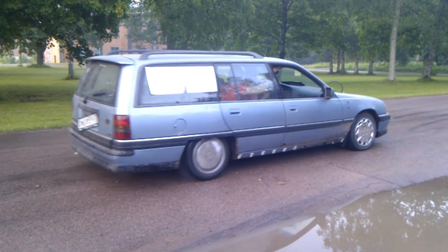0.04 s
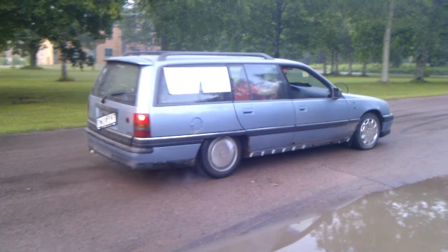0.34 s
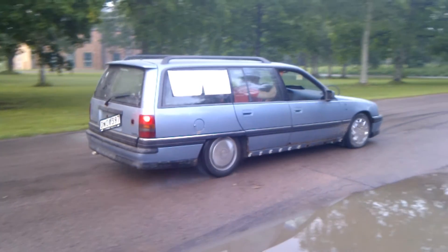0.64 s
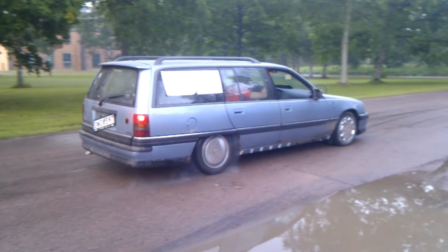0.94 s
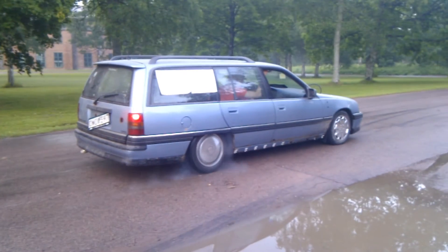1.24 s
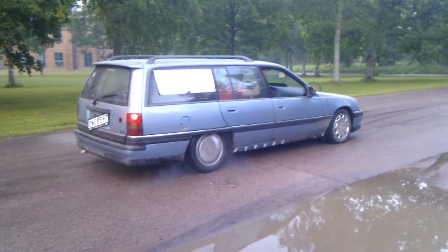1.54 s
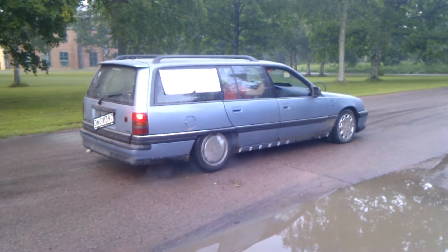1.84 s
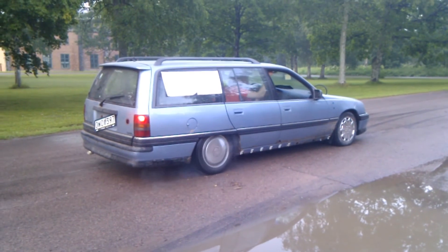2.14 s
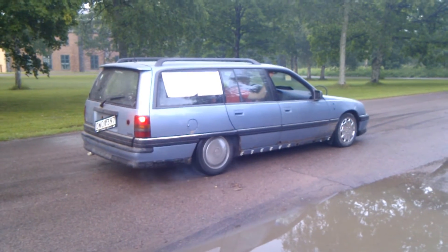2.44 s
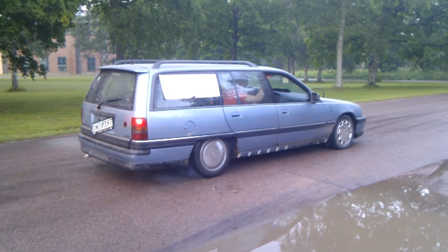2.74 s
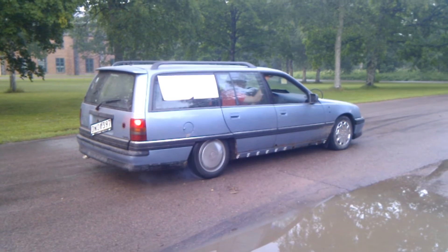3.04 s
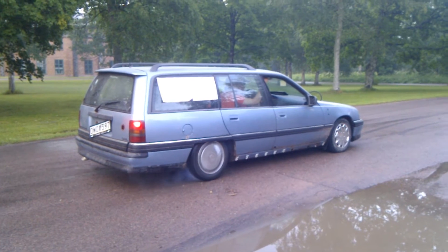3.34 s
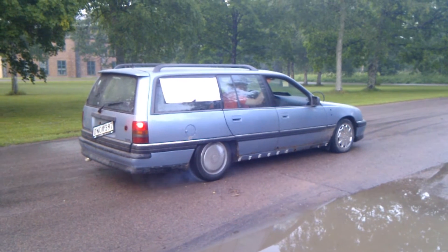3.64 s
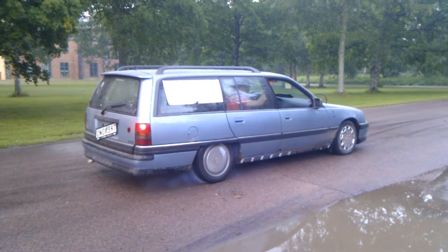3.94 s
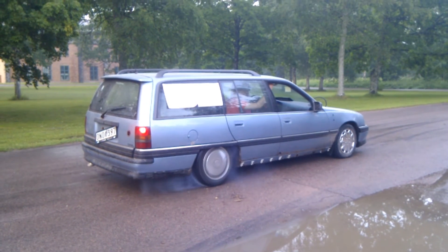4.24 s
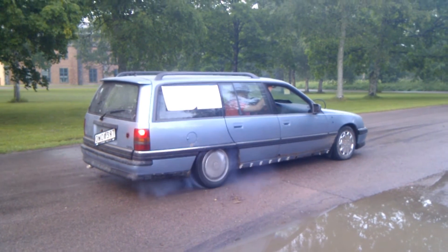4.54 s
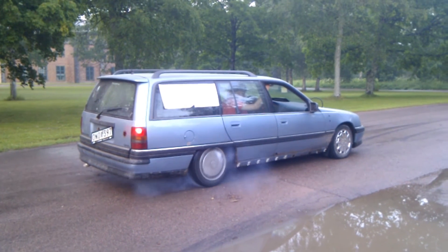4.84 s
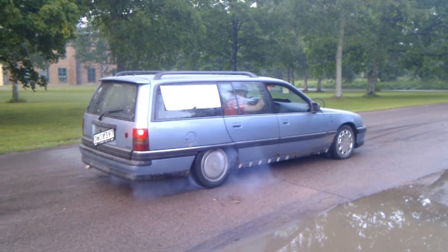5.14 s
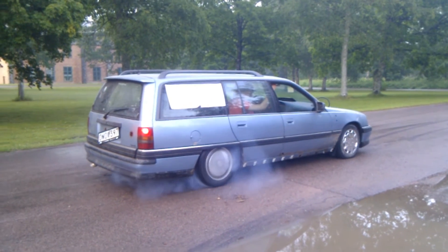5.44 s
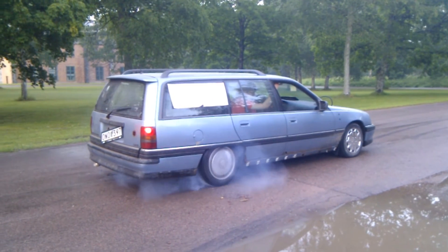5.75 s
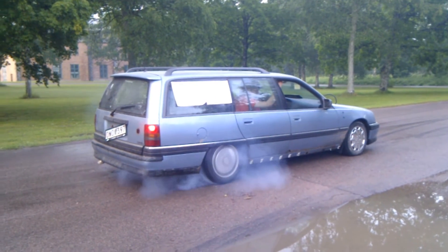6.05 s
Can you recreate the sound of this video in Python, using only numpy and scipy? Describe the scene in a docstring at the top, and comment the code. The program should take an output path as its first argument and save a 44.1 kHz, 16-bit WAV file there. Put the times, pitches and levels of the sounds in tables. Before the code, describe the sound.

Close, droning car engine climbs and dips at high revs during a burnout, with hissing exhaust and rough tyre squeals.

```python
"""Burnout on wet asphalt

A turbocharged straight six, a few metres from a phone. The revs climb, sag at five throttle lifts, then
climb in one long pull. Firing pulses make the exhaust drone and rasp; gas rushes out with the boost.
The spinning tyres scrub, and squeal where the road has dried."""
import sys
import numpy as np
from scipy import signal
from scipy.fft import rfft, irfft
from scipy.io import wavfile
from scipy.ndimage import uniform_filter1d

SR = 44100
rng = np.random.default_rng(int(sys.argv[2]) if len(sys.argv) > 2 else 0)


def generate_wav(sig):
    """Save sig (samples, or channels by samples) to the path in sys.argv[1] as 16-bit PCM at SR."""
    pcm = np.round(np.clip(np.atleast_2d(sig).T, -1, 1) * 32767).astype(np.int16)
    wavfile.write(sys.argv[1], SR, pcm)


N = 269010
TIME = np.arange(N) / SR
FREQS = np.fft.rfftfreq(N, 1 / SR)

# Throttle pulls: (opens [s], lifts [s], start firing rate [Hz], top firing rate [Hz], easing [-],
# spool-up [s], relative gas rush at full boost [dB], its sag by the lift [dB])
PULLS = [(0.0, 0.928, 176.4, 230, 0.37, 0.49, -22.5, 1), (1.04, 1.714, 187.9, 219.1, 1.53, 0.59, -22.5, 2),
         (1.875, 2.578, 176.5, 231, .21, 0.45, -23, -1), (2.731, 3.288, 187.2, 232, 0.013, 0.44, -22.5, .5),
         (3.459, 4.235, 180.2, 231.9, .76, 0.45, -22.5, 5.5),
         (4.471, 6.2, 172.3, 237.9, 0.36, 0.72, -26, 1.5)]
# Overrun after each pull but the last:
# (length [s], falter [dB], firing note boom [dB], gas rush vented [dB], overtone softening [dB])
OVERRUNS = [(0.17, 14, 3.3, 2.5, 1.5), (0.17, 12, 3.5, 5.5, 7.5), (0.24, 9, 4.5, 8.5, 2.5),
            (0.2, 7, 5, 7.5, 4.5), (0.16, 2, 2, 5.5, 7)]


def exhaust(cycles, firing_hz, note_db=-0.5, shake_db=0.79, bank_db=-7.0, rasp_db=1, slip_rad=0.011):
    """Firing note, two overtones and the three-cylinder banks' beat sweep the pipe's peaks, over a rasp."""
    # Pipe response: (frequency [Hz], gain [dB])
    pipe = [(176, -26), (192, -23.5), (203, -21.5), (212, -21.6), (221, -18.5), (228, -19), (235, -18),
            (268, -21), (300, -28.5), (352, -20.5), (380, -20.5), (392, -21.5), (404, -27.5), (418, -27.5),
            (432, -25), (450, -23), (470, -22), (530, -38.5), (585, -35.5), (640, -44.5), (700, -38.5)]
    # Lines from unequal cylinders: (multiple of the cycle rate [-], relative level [dB])
    orders = [(3, -48.5), (7, -41.5), (8, -46.5), (10, -49.5), (11, -39), (13, -40), (14, -42), (15, -44),
              (22, -44.5), (24, -49), (25, -50), (26, -46), (27, -43), (28, -44), (30, -43), (31, -46.5),
              (32, -45), (33, -44), (34, -43.5), (35, -44.5), (36, -59), (38, -46), (39, -44)]
    shut, boom_db, soft_db = overrun()
    pipe_db = {k: np.interp(k * firing_hz, *np.transpose(pipe)) for k in (1, 1.5, 2, 3)}
    angle = 2 * np.pi * cycles
    fire = 6 * angle
    drone = amp(pipe_db[1] + note_db + boom_db + shake_db * wander(25)) * np.cos(fire)
    drone += amp(pipe_db[2] - soft_db + shake_db * wander(25)) * np.cos(2 * fire + 2 * np.pi * 0.21)
    drone += amp(pipe_db[3] - soft_db + shake_db * wander(25)) * np.cos(3 * fire)
    banks = amp(pipe_db[1.5] + bank_db - 6 * shut + 0.72 * wander(7.3)) * np.cos(1.5 * fire)
    rasp = np.zeros(N)
    for k, db in orders:
        gain = amp(db + 1.74 * wander(14))
        slip = k * slip_rad * wander(14)  # high orders are least steady
        rasp += gain * np.cos(k * angle + slip + 2 * np.pi * rng.random())
    falter_db = sum(depth_db * bump(pull[1], half_s=0.012)
                    for pull, (_, depth_db, *_) in zip(PULLS, OVERRUNS))
    return np.sqrt(2) * amp(-falter_db) * (drone + banks + amp(rasp_db) * rasp)


def engine_speed(lift_lead_s=0.04394, flywheel_s=0.0853):
    """Firing rate [Hz]: climbs until torque fades just before each lift; the flywheel rounds the turns."""
    # Tyres bite and drag the revs down: (time [s], half length [s], drop [Hz])
    bite = (5.208, 0.225, 7.6)
    u = np.linspace(0, 1, 30)
    climbs = []
    for opens_s, lifts_s, start_hz, top_hz, easing, *_ in PULLS:
        times_s = opens_s + (lifts_s - lift_lead_s - opens_s) * u
        rates_hz = start_hz + (top_hz - start_hz) * (u + easing * u * (1 - u))
        climbs += zip(times_s, rates_hz)
    bite_s, half_s, drop_hz = bite
    return eased(through(climbs), flywheel_s) - drop_hz * bump(bite_s, half_s)


def overrun(throttle_s=0.011):
    """Throttle shut after a lift: (shut [0..1], firing note boom [dB], overtone softening [dB])."""
    controls = np.zeros((3, N))
    for (_, lifts_s, *_), (length_s, _, boom_db, _, soft_db) in zip(PULLS, OVERRUNS):
        shut = (TIME > lifts_s) * (TIME < lifts_s + length_s)
        controls += np.outer([1, boom_db, soft_db], shut)
    return [eased(control, throttle_s) for control in controls]


def tyres(cycles, firing_hz, scrub_db=-26.0, spin_up_db_per_hz_s=0.037, waver_hz=18, mid_speed_hz=205):
    """Rubber scrubs with the torque pulses, harder on spin-up; tread and carcass sing roughly."""
    # Scrub spectrum: (frequency [Hz], gain [dB])
    spectrum = [(200, -23), (550, -6), (720, -6), (900, -2.5), (1050, -5), (1280, 0.5), (1650, -1),
                (1950, -5.5), (2350, -7.5), (2900, -11.5), (3900, -31.5)]
    # Tyre resonances, going flat as the rubber heats: (cold pitch [Hz], sag [Hz/s], width [Hz],
    # relative level at mid speed [dB], slope with firing rate [dB/Hz])
    tread = [(1653, 22, 200, -35, -0.2254), (1257, 18, 160, -35, .04), (891.5, 0.5, 50, -38.5, -.1)]
    # Squeals on dried road: (time [s], half length [s], pitch [Hz], width [Hz], relative level [dB])
    flares = [(0.378, .18, 1258, 160, -33.5), (2.682, 0.11, 1657, 240, -30), (2.924, 0.15, 890, 60, -34.5),
              (3.383, .12, 1555, 280, -31), (3.816, .12, 1143, 160, -35), (4.522, 0.34, 1550, 160, -28),
              (4.92, .06, 1515, 130, -28.5), (4.95, 0.54, 890, 60, -34), (5.35, 0.11, 1177, 150, -24.5),
              (5.917, 0.32, 1169, 150, -31)]
    spin_up_hz_s = np.maximum(np.gradient(firing_hz) * SR, 0)
    pulses = puffs(cycles, depth=0.23, sharp=0.12, uneven=0.05)
    scrub = unit(colour(patchy(pulses, depth_db=1.9), spectrum))
    scrub *= amp(scrub_db + spin_up_db_per_hz_s * spin_up_hz_s + 0.5 * wander(33))
    song = np.zeros(N)
    for cold_hz, sag_hz_s, width_hz, db, slope in tread:
        pitch_hz = cold_hz - sag_hz_s * TIME + waver_hz * wander(14)
        song += amp(db - 2 + slope * (firing_hz - mid_speed_hz)) * ring(pitch_hz, width_hz)
    squeals = sum(amp(db - 1) * bump(at_s, half_s) * ring(hz, width_hz)
                  for at_s, half_s, hz, width_hz, db in flares)
    return scrub + song + squeals


def gas_rush(cycles, rush_db=-2.5, flutter_db=1.05):
    """Boosted gas hisses out of the tailpipe in puffs; the turbo whistles over it."""
    # Hiss spectrum: (frequency [Hz], gain [dB])
    spectrum = [(500, -17.5), (1200, -9.5), (1900, 0), (2300, 5), (2600, 0.5), (2950, 1.5), (3250, 1),
                (3500, -5), (3750, -12.5), (4000, -18)]
    # Breathy whistles near full boost: (time [s], half length [s], pitch [Hz], level [dB])
    whistles = [(.72, .1, 2274, -43), (1.448, .08, 2490, -35), (1.671, .055, 2363, -27.5),
                (2.35, .13, 2261, -34.5), (2.555, 0.041, 3220, -36), (3.098, .06, 2797, -41),
                (3.259, 0.027, 3278, -32.5), (3.932, 0.097, 3140, -35), (5.249, 0.15, 3101, -34.5),
                (5.6, 0.37, 2309, -39)]
    pulses = puffs(cycles, depth=0.15, sharp=0.13, uneven=0.034)
    hiss = unit(colour(patchy(pulses, depth_db=2.0), spectrum))
    whistle = sum(amp(db) * bump(at_s, half_s) * ring(hz, width_hz=100)
                  for at_s, half_s, hz, db in whistles)
    return amp(boost() + rush_db + flutter_db * wander(32)) * hiss + whistle


def boost(first_db=-24, vent_s=0.035):
    """Relative gas rush [dB]: the turbo spools up, sags, and vents at the lift."""
    points, left_db = [], first_db
    vents_db = [row[3] for row in OVERRUNS] + [0]
    for (opens_s, lifts_s, *_, spool_s, full_db, sag_db), vent_db in zip(PULLS, vents_db):
        full_s = min(opens_s + spool_s, lifts_s)
        points += [(opens_s, left_db), (full_s, full_db), (lifts_s, full_db - sag_db)]
        left_db = full_db - sag_db - vent_db
        points += [(lifts_s + vent_s, left_db)]
    return through(points)


def pipe_rumble(rumble_db=-27.5):
    """Turbulence booms in the silencer and thuds when the firing is uneven."""
    # Rumble spectrum: (frequency [Hz], gain [dB])
    spectrum = [(20, -25.5), (35, -18.5), (50, -13), (70, -6), (115, -3), (165, -2.5), (260, -1), (460, -1),
                (560, -10.5), (800, -15.5), (1500, -38.5)]
    # Thuds: (time [s], half length [s], level [dB])
    burbles = [(1.835, 0.056, -25), (3.443, 0.019, -25), (4.244, 0.027, -21), (4.337, 0.044, -21.5),
               (4.4, .018, -22)]
    rumble = amp(rumble_db + wander(5)) * unit(colour(rng.standard_normal(N), spectrum))
    thuds = sum(amp(db) * bump(at_s, half_s) for at_s, half_s, db in burbles)
    return rumble + thuds * ring(hz=300, width_hz=170)


def puffs(cycles, depth, sharp, uneven):
    """Noise swelling at each firing, more for one cylinder bank than the other."""
    fire = 2 * np.pi * cycles * 6
    edge = np.cos(2 * fire) + np.cos(3 * fire)
    swell = np.exp(depth * np.cos(fire) + sharp * edge + uneven * np.cos(fire / 2))
    return swell * rng.standard_normal(N)


def patchy(x, depth_db):
    """Turbulence lifts and sinks patches a few hundred Hz wide for tens of ms."""
    spectra = signal.stft(x, nperseg=512, noverlap=384)[2]
    field = uniform_filter1d(rng.standard_normal(spectra.shape), size=3, axis=0)
    field = uniform_filter1d(field, size=22, axis=1)
    return signal.istft(spectra * amp(depth_db * unit(field)), nperseg=512, noverlap=384)[1][:N]


def ring(hz, width_hz):
    """Randomly driven resonance following a pitch, rms 1."""
    angle = 2 * np.pi * np.cumsum(hz * np.ones(N)) / SR
    return wander(width_hz / 2) * np.cos(angle) + wander(width_hz / 2) * np.sin(angle)


def wander(rate_hz):
    """Random drift, rms 1, rolled off above the rate."""
    grid_s = np.linspace(0, TIME[-1], 8192)
    hz = np.fft.rfftfreq(len(grid_s), grid_s[1])
    spectrum = rfft(rng.standard_normal(len(grid_s))) / (1 + (hz / rate_hz) ** 4)
    return np.interp(TIME, grid_s, unit(irfft(spectrum)))


def bump(at_s, half_s):
    """Bell curve in time, peak 1."""
    return np.exp(-((TIME - at_s) / half_s) ** 2)


def through(points):
    """Straight lines through (time [s], value) points."""
    return np.interp(TIME, *np.transpose(points))


def eased(x, half_s):
    """Rounds a control's corners with a bell curve."""
    lag_s = np.arange(-(SR // 3), SR // 3 + 1) / SR
    bell = np.exp(-(lag_s / half_s) ** 2)
    return signal.fftconvolve(np.pad(x, len(lag_s) // 2, "edge"), bell / bell.sum(), "valid")


def colour(x, points):
    """Filters by (frequency [Hz], gain [dB]) points."""
    hz, db = np.transpose(points)
    return irfft(rfft(x) * amp(np.interp(np.log(FREQS + 1), np.log(hz), db)), N)


def low_pass(x, edge_hz):
    """Steep low-pass."""
    return signal.oaconvolve(x, signal.firwin(601, edge_hz, window=("kaiser", 9), fs=SR), "same")


def amp(db):
    """Decibels to gain."""
    return 10 ** (np.asarray(db) / 20)


def unit(x):
    """Scales to rms 1."""
    return x / np.sqrt(np.mean(x ** 2) + 1e-20)


def scene():
    """One crankshaft times exhaust, gas rush and tyres, over the silencer's rumble."""
    firing_hz = engine_speed()
    cycles = np.cumsum(firing_hz * (1 + 0.002 * wander(35))) / SR / 6  # six firings a cycle
    return (exhaust(cycles, firing_hz) + pipe_rumble() + gas_rush(cycles) + tyres(cycles, firing_hz))[None]


def record(dry, ceiling=0.51, phone_rate_hz=8000):
    """The phone rounds the peaks and samples coarsely, mirroring the treble above half its rate."""
    # Phone treble response: (frequency [Hz], gain [dB])
    treble = [(3000, 1), (3500, 1.5), (4000, 3.5), (4800, -14), (5700, -29.5), (6450, -43), (7000, -53),
              (7600, -73)]
    rounded = ceiling * np.tanh(dry[0] / ceiling)
    narrow = low_pass(rounded, phone_rate_hz / 2)
    mirrored = narrow * (1 + 2 * np.cos(2 * np.pi * phone_rate_hz * TIME))
    return low_pass(colour(mirrored, treble), edge_hz=7150)[None]


dry = scene()
out = record(dry)
generate_wav(out)
```